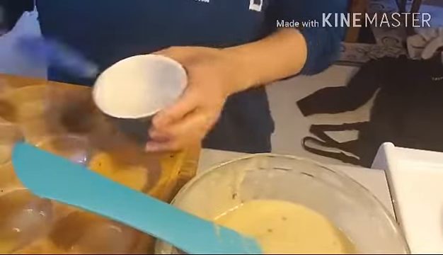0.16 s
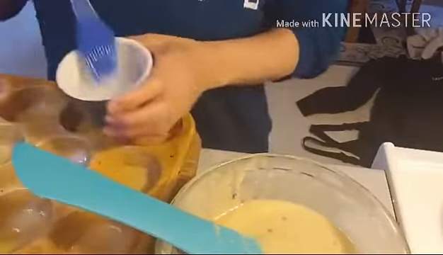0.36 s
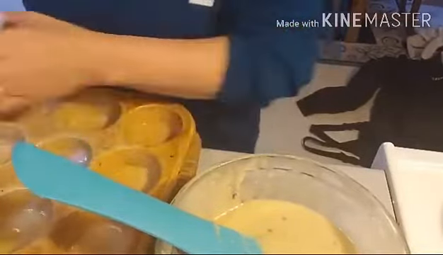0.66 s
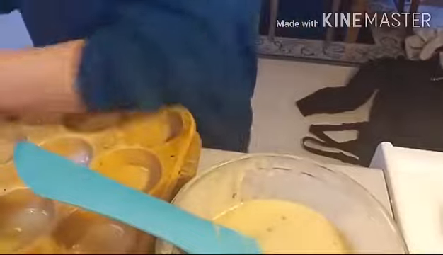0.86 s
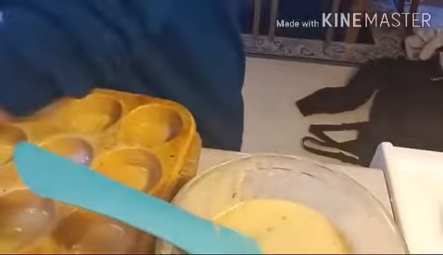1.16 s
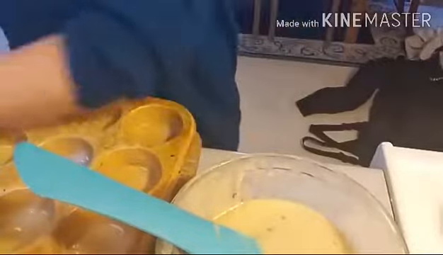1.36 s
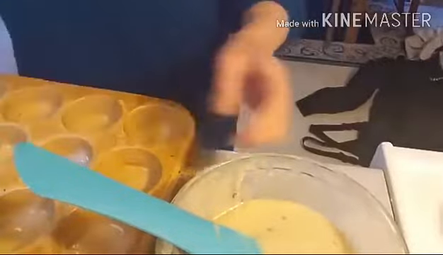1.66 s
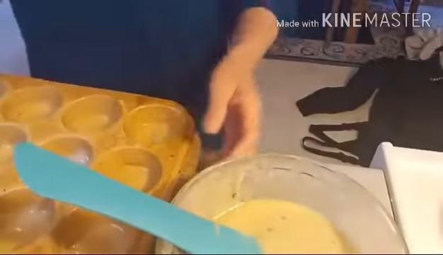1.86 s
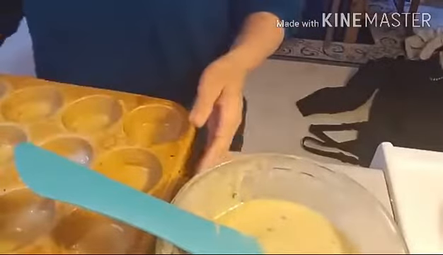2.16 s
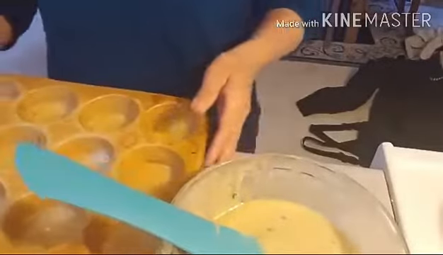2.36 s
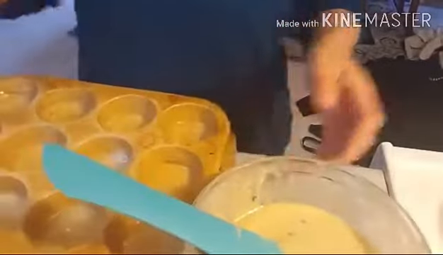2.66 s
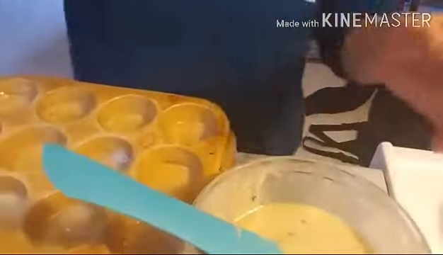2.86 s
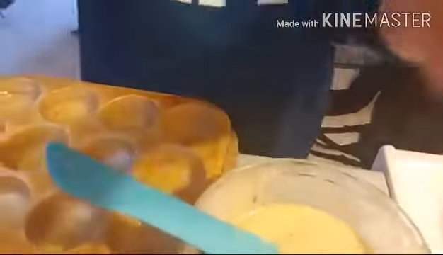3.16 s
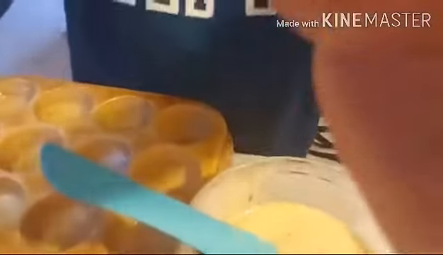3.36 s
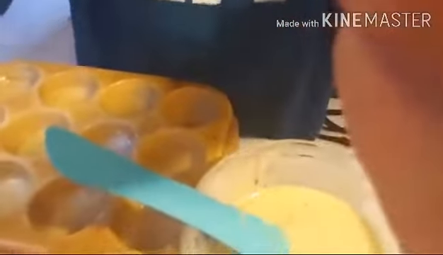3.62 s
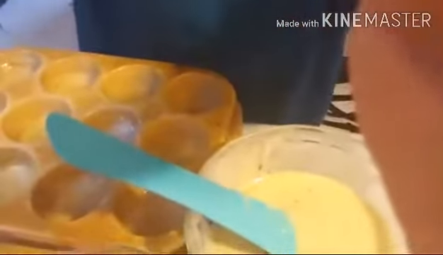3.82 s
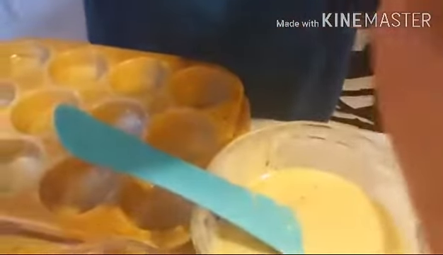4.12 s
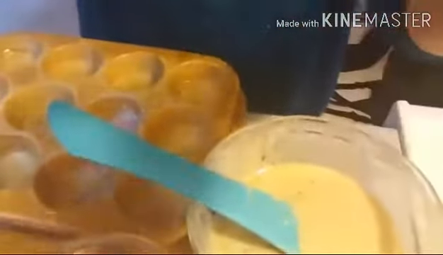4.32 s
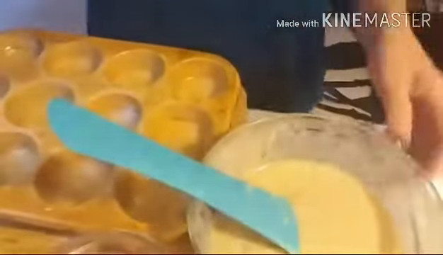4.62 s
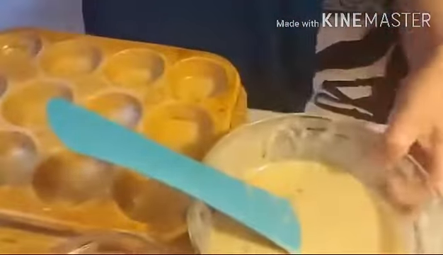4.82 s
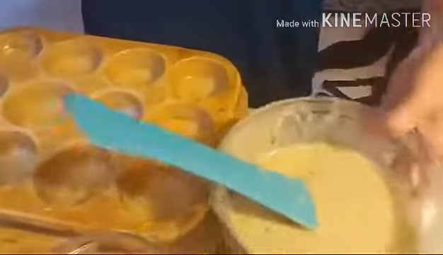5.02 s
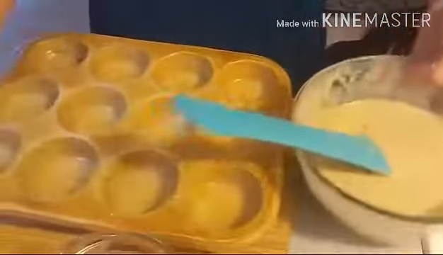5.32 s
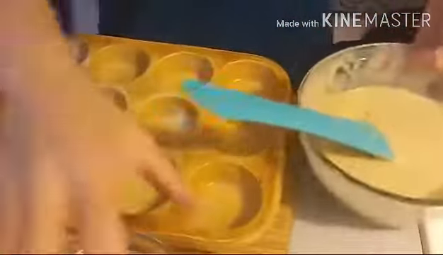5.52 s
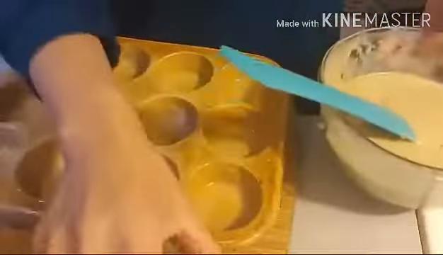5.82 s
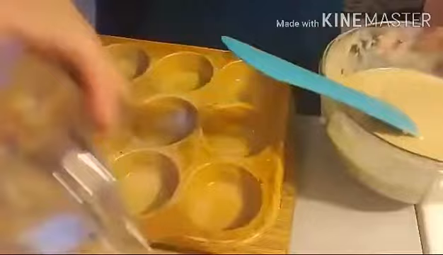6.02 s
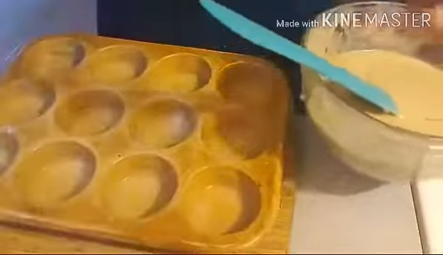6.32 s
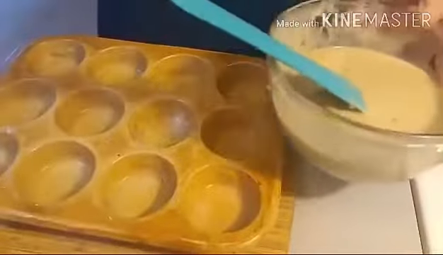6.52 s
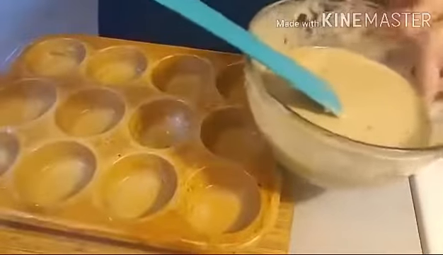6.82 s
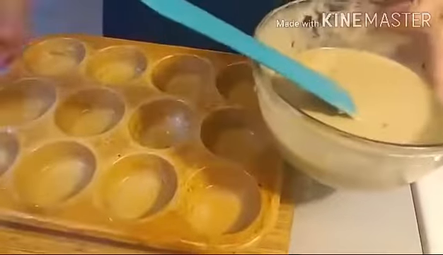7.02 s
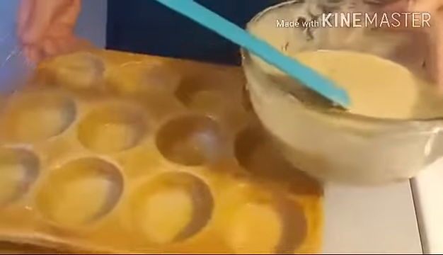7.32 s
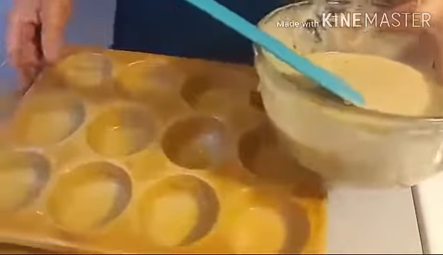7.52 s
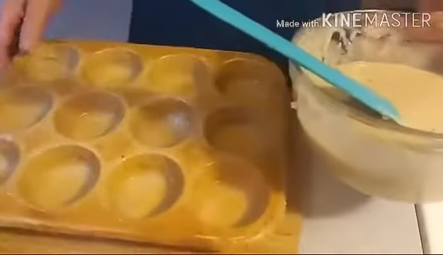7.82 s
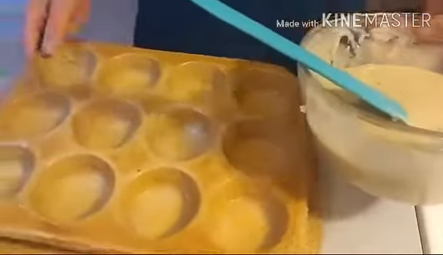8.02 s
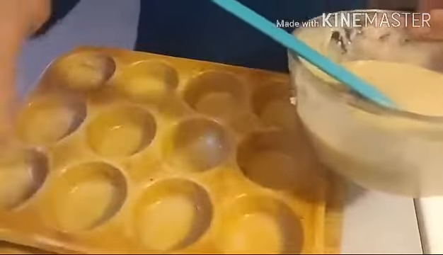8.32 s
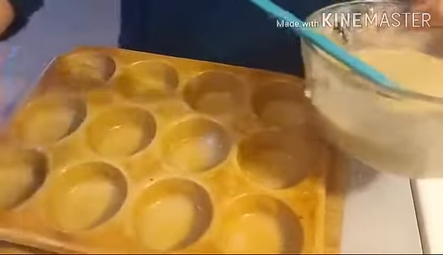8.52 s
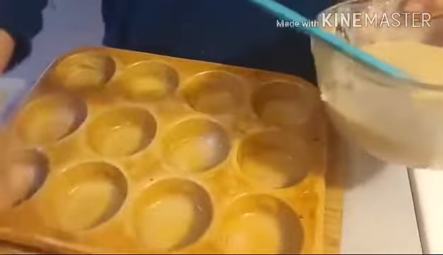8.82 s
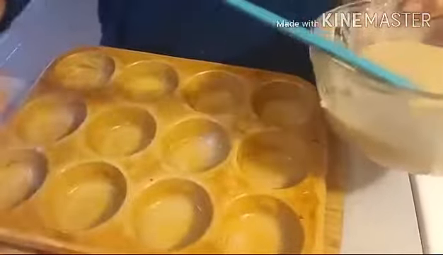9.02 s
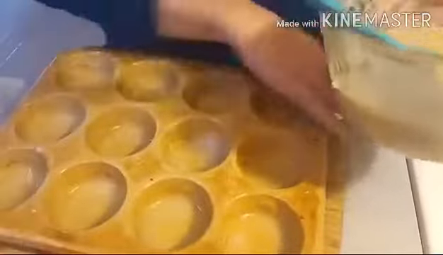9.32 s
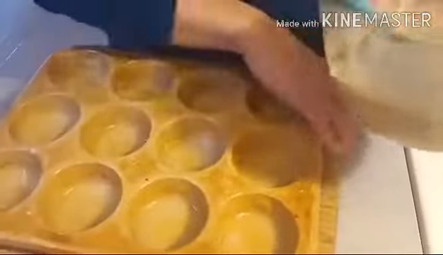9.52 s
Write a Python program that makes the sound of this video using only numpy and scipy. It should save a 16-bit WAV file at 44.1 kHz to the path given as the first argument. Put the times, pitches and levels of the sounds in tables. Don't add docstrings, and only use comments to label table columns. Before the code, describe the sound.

A small, fairly dry kitchen heard close from a handheld microphone, with a very faint low appliance drone that drops after about 1.9 seconds, and soft grip rumble. At 0.06 a lid double-taps lightly. Low bump at 1.1; thin high squeaks from 1.3 to 1.65 accompany a cup set down in dull knocks at 1.55 and, louder, 1.65. A glass bowl lands and rocks at 2.8 to 2.9. From 3.2 to 5 only muffled bumps, faint rubbing and tiny squeaks. A rustle at 5.4 leads to heavy, damped wooden board knocks at 5.56, 5.7 and 5.76, then 6.9 to 7.05. A muffin tin clatters brightly from 7.68 to 7.9, with another knock at 8.19 amid sliding. At 9.06 a glass lands ringing, scrapes strongly around 9.15, settles at 9.27, and a sharp dry snap follows at 9.37, fading into soft rustle.

```python
import sys
import numpy as np
from scipy import signal
from scipy.fft import rfft, irfft, next_fast_len
from scipy.io import wavfile
from scipy.ndimage import uniform_filter1d, map_coordinates

SR = 44100
rng = np.random.default_rng(int(sys.argv[2]) if len(sys.argv) > 2 else 0)


def unload_wav(signal):
    wavfile.write(
        sys.argv[1],
        SR,
        np.round(np.clip(np.atleast_2d(signal).T, -1, 1) * 32767).astype(np.int16),
    )


def field_ratio(decibels):
    return 10 ** (np.asarray(decibels, dtype=float) / 20)


N = 426447


def unit(x):
    return x / np.sqrt(np.mean(x ** 2) + 1e-20)


def along(points, hz):
    f, v = np.transpose(points)
    return np.interp(np.log(hz + 1), np.log(f + 1), v)


def curve(points):
    s, value = np.transpose(points)
    return np.interp(np.arange(N) / SR, s, value)


def wobble(rate):
    knots = rng.standard_normal(int(N * rate / SR) + 4)
    return map_coordinates(knots, [np.arange(N) * rate / SR])


# frequency in Hz, likeness from 0 to 1.
ALIKE = [(60, .99), (180, .94), (520, .75), (1540, .15), (4560, 0), (13500, 0)]


def diffuse(pair, gain):
    m = next_fast_len(pair.shape[1] + 4096)
    hz = np.fft.rfftfreq(m, 1 / SR)
    turn = np.arccos(np.clip(along(ALIKE, hz), -1, 1)) / 2
    spectrum = rfft(pair, m) * gain(hz) * [np.cos(turn), np.sin(turn)]
    mid, side = irfft(spectrum, m)[:, :pair.shape[1]]
    return unit(np.array([mid + side, mid - side]))


def rush(spectrum, grain_db, rate):
    grains = field_ratio(grain_db * wobble(rate)) * rng.standard_normal((2, N))
    return diffuse(grains, lambda hz: field_ratio(along(spectrum, hz)))


def patchy(x, depth_db):
    z = signal.stft(x, nperseg=512)[2]
    field = uniform_filter1d(rng.standard_normal(z.shape[1:]), size=4, axis=0)
    field = uniform_filter1d(field, size=9, axis=1)
    return unit(signal.istft(z * field_ratio(depth_db * unit(field)), nperseg=512)[1][:, :N])


def causal(gain_db):
    cepstrum = irfft(np.log(field_ratio(gain_db)))
    half = cepstrum.shape[-1] // 2
    cepstrum[..., 1:half] *= 2
    cepstrum[..., half + 1:] = 0
    return np.exp(rfft(cepstrum))


# frequency in Hz, t60 in s.
KITCHEN = [(150, 0.27), (600, 0.21), (3000, .28), (12000, 0.094)]


def kitchen(x, room_db):
    hz, t, z = signal.stft(rng.standard_normal((2, SR // 2)), SR, nperseg=256)
    decay = field_ratio(-60 * t / along(KITCHEN, hz)[:, None])
    tail = signal.istft(z * decay, SR, nperseg=256)[1]
    tail = diffuse(tail, np.ones_like)
    late = np.pad(x, (round(.005 * SR), 0))[None]
    return field_ratio(room_db) * signal.fftconvolve(late, tail / np.linalg.norm(tail[0]), axes=1)


# lower edge in Hz, upper edge in Hz.
BANDS_HZ = [(50, 300), (300, 850), (900, 2400), (2500, 3500), (3600, 6000), (6000, 12600)]
RING_S = [.035, .035, .04, .04, .14]
CUP_RING_S, BOWL_RING_S, BOARD_RING_S, TIN_RING_S, GLASS_RING_S = RING_S
THUD_GROWS, SIZZLE_GROWS = 1.494, 1
RAGGED_MAX_DB = 4.5
UNLIKE = 0.57


def knocks(hits, modes, ring_s, thud_db, crisp_db, sizzle_db, chatter_s, rise_s, clack_db, patchy_db,
           pan_db, lag_ms, room_db, beamed_db):
    out, size = np.zeros((2, N + 2 * SR)), 16384
    t, f = np.arange(size) / SR, np.fft.rfftfreq(size, 1 / SR)
    hz, level, t60 = np.array(modes)[:, :, None, None].transpose(1, 0, 2, 3)
    ear = np.array([[-.5], [.5]])
    apart = lambda f: ear * f / (f + 500)
    width = np.log(1000) / (np.pi * np.minimum(t60, ring_s))
    for s, db, weight_db, hard_db, linger_db in hits:
        scatter = rng.standard_normal((3, len(modes), 1, 1))
        centre = hz * (1 + .006 * scatter[0])
        gain = field_ratio(level + 3 * scatter[1] + 5 * apart(hz) * scatter[2])
        ring = (gain * 1j * f * centre / (centre ** 2 - f ** 2 + 1j * f * width)).sum(0)

        rough = uniform_filter1d(rng.standard_normal((2, len(f))), size=80)
        shared, own = uniform_filter1d(rough, size=80)
        ragged_db = f / (f + 900) * unit(shared) + 1.8 * apart(f) * unit(own)
        ragged_db = min(patchy_db, RAGGED_MAX_DB) * ragged_db
        clack = causal(ragged_db - 5 * np.log2(1 + f / 300))

        push = (1 - np.exp(-t / rise_s)) ** 2 * field_ratio(-60 * t / chatter_s / field_ratio(linger_db))
        force, stray = rfft(rng.standard_normal((2, size)) * push)
        travel = force + 2 * UNLIKE * apart(f) * stray
        travel = travel * np.exp(2j * np.pi * f * ear * lag_ms / 1000)
        pair = np.roll(irfft(travel * np.array([ring, clack])), shift=16, axis=2)
        pair[1] *= field_ratio(-60 * t / .09)

        balance_db = (thud_db + THUD_GROWS * weight_db, weight_db, 0,
                      crisp_db + hard_db, hard_db, sizzle_db + SIZZLE_GROWS * hard_db)
        blow = spread = 0
        for edges, band_db in zip(BANDS_HZ, balance_db):
            band = signal.butter(4, edges, "bandpass", fs=SR, output="sos")
            part = signal.sosfilt(band, pair)
            rung = unit(part[0])
            ragged = field_ratio(clack_db[edges[0] > 2400]) * unit(part[1])
            side = field_ratio(-ear * pan_db * (edges[0] > 200))
            scale = field_ratio(db + band_db) / np.abs((rung + ragged).mean(0)).max()
            blow = blow + side * scale * (rung + ragged)
            spread = spread + scale * (field_ratio(beamed_db) * rung + ragged)[0]
        tail = kitchen(spread, room_db)
        at = round((s - rise_s) * SR)
        out[:, at:at + size] += blow
        out[:, at:at + tail.shape[1]] += tail
    return out[:, :N]


# time in s, level in dB.
DRONE = [(0, -60), (1.6, -56.5), (1.95, -65.5), (5, -62.5), (7.5, -62.5), (8.2, -62.5), (9.67, -63.5)]
# frequency in Hz, density in dB per Hz.
AIR = [(60, -34.5), (110, 0), (400, -9.5), (800, -28), (1050, -32.5), (2500, -39.5), (7500, -45.5),
       (13500, -49.5)]
# centre in Hz, width in Hz, gain in dB.
CASING = [(162, 18, 8), (247, 22, 11.5), (359, 16, 12), (550, 60, 3), (740, 120, 3)]


def drone():
    casing = lambda f: 1 + sum(field_ratio(db) / (1 + (2 * (f - c) / w) ** 2) for c, w, db in CASING)
    noise = diffuse(rng.standard_normal((2, N)), lambda hz: field_ratio(along(AIR, hz)) * casing(hz))
    return field_ratio(curve(DRONE) + 0.4 * wobble(13)) * noise


# time in s, level in dB.
GRIP = [(0.0, -56), (0.97, -60.5), (1.48, -58), (1.88, -67.5), (2.91, -62.5), (3.53, -68.5), (5.38, -58.5),
        (5.66, -82.5), (5.93, -61), (6.68, -71), (7.0, -58), (7.38, -71), (7.78, -43), (7.94, -55.5),
        (8.7, -65), (9.18, -59), (9.67, -67.5)]
# frequency in Hz, density in dB per Hz.
RUMBLE = [(12, -43.5), (20, -10), (81, -2.5), (130, -16), (186, -4.5), (268, -12.5), (390, -45),
          (660, -120)]


def hands():
    return field_ratio(curve(GRIP)) * rush(RUMBLE, grain_db=3.5, rate=26)


# start in s, hold in s, level in dB, pressure in dB, dryness in dB.
STROKES = [(.01, 0.031, -69.5, 5.5, -9), (0.973, 0.02, -69.5, 9.5, -0.5), (1.195, 0.048, -68, -6.5, 0),
           (1.336, 0.02, -64, 3, -12), (1.435, 0.13, -91.5, 11.5, 13), (2.528, 0.027, -72.5, -4.5, -16.5),
           (2.752, 0.066, -57.5, -4, -5.5), (3.194, 0.016, -72.5, 12.5, -13.5),
           (3.959, 0.055, -77.5, -30.5, -2), (4.139, 0.048, -80, -11.5, -2.5),
           (4.251, 0.05, -63.5, -7.5, -6.5), (4.352, 0.017, -67.5, -11.5, -10),
           (4.709, 0.043, -85.5, 7, -24), (5.329, 0.03, -67, 9, -25.5), (5.389, 0.045, -60.5, 7, -20),
           (5.483, 0.14, -53, 4, -7), (6.09, 0.026, -96.5, 30, 6), (6.597, 0.22, -90.5, -30, 7),
           (7.224, 0.057, -86.5, 20.5, -3), (7.625, 0.18, -58.5, -7, -4), (8.125, 0.048, -52, -4, -3.5),
           (8.424, 0.18, -62.5, 0.5, -5), (8.865, 0.018, -55.5, 2.5, -13), (9.145, 0.076, -39, 0, -4.5),
           (9.334, 0.075, -65, -2, 17), (9.435, 0.1, -63, -13, -12)]
REST_DB = [-84.5, -89, -89.5]
RISE_S, FADE_S, RISE_SHARE, FADE_SHARE = 0.032, 0.065, 0.5, 0.82


def strokes():
    t = np.arange(N) / SR
    gain = field_ratio(np.array(REST_DB))[:, None] * np.ones(N)
    for s, hold, db, pressure_db, dryness_db in STROKES:
        near = slice(max(round((s - .6) * SR), 0), round((s + hold + .9) * SR))
        before = np.maximum(s - t[near], 0) / (RISE_S + RISE_SHARE * hold)
        after = np.maximum(t[near] - s - hold, 0) / (FADE_S + FADE_SHARE * hold)
        register_db = np.array([[pressure_db], [0], [dryness_db]])
        gain[:, near] += field_ratio(db + register_db) * field_ratio(-30 * (before + after))
    return gain


# frequency in Hz, density in dB per Hz.
DRAG = [(150, -48), (300, -3), (550, 2), (900, -6), (1400, -41.5)]
# frequency in Hz, density in dB per Hz.
SLIDE = [(290, -42), (500, -17), (736, -10), (1250, -9.5), (2400, -11), (3800, -19.5), (5850, -60),
         (9900, -120)]
# frequency in Hz, density in dB per Hz.
FIZZ = [(1760, -22), (3000, -7), (5630, -6), (7570, -3.5), (10800, -15), (12300, -12), (13500, -30)]


def sliding():
    m = next_fast_len(N)
    hz = np.fft.rfftfreq(m, 1 / SR)
    rim = sum(field_ratio(db / 3) / (1 + ((hz - c) / 45) ** 2) for c, db, _ in GLASS)
    t, grip_db = np.arange(N) / SR, 2 * wobble(23)
    layers = [patchy(rush(DRAG, grain_db=-1.0, rate=52), depth_db=4.5),
              patchy(rush(SLIDE, grain_db=0.5, rate=260), depth_db=3.5),
              patchy(rush(FIZZ, grain_db=2, rate=240), depth_db=5.5)]
    out = sum(field_ratio(grip_db) * gain * layer for gain, layer in zip(strokes(), layers))
    sung = irfft(rfft(out, m) * (.35 + 2.2 * rim), m)[:, :N]
    dragged = (t > GLASS_HITS[0][0]) & (t < SNAP_HITS[0][0])
    return np.where(dragged, sung, out)


# time in s, peak in dB (900-2400 Hz), weight in dB, hardness in dB, lingering in dB.
LID_HITS = [
    (0.0637, -30, 0.46, -20, 0),
    (0.068, -26, 0.31, -27, 0),
]
# frequency in Hz, level in dB, t60 in s.
LID = [(673, -10, .025), (754, -2, 0.035), (1036, -3, 0.018), (1220, -4.5, 0.032), (1430, 1, 0.034),
       (1600, -9, 0.0238), (1750, -7, 0.0304), (3250, -15, 0.017), (4280, -21, 0.017)]


def lid():
    return knocks(LID_HITS, LID, CUP_RING_S, thud_db=-19, crisp_db=3.5, sizzle_db=-14.5,
                  chatter_s=0.018, rise_s=.001, clack_db=(-3, 0), patchy_db=5,
                  pan_db=0.2, lag_ms=0.07, room_db=-13, beamed_db=-2.5)


# time in s, peak in dB (900-2400 Hz), weight
# in dB, hardness in dB, lingering in dB.
CUP_HITS = [(0.3294, -92.5, 40, -17, -1.5), (0.6424, -88, 30.5, -10, 5), (1.3222, -56, 3, -10, 1.5),
            (1.5457, -25, 11.5, -12, -4), (1.5545, -29.5, 15, -17, -3), (1.5674, -30.5, 2, -25.5, -1),
            (1.6478, -16, 0.5, -22, -5.5), (1.6538, -19, 4, -17, 0), (1.666, -23.5, 2.5, -17.5, -1),
            (1.6784, -26.5, -3, -19, 0), (1.69, -32, 0, -15, 1), (1.718, -38, 2, -5.5, -0.5),
            (1.628, -42, 10, -24.5, 2),
            (2.0116, -80, 24, -25, 0),
]
# frequency in Hz, level in dB, t60 in s.
CUP = [(332, -7.5, .06), (517, 9.5, 0.014), (677.7, -4.5, .06), (773, -8.5, .06), (1280, 0, 0.0088),
       (1750, -14, 0.087), (4380, -36, .1), (7160, -11, 0.2), (4300, -32, .06), (11080, -21, .1)]


def cup():
    return knocks(CUP_HITS, CUP, CUP_RING_S, thud_db=-13.0, crisp_db=2, sizzle_db=-7,
                  chatter_s=0.04, rise_s=0.001, clack_db=(-3, -5.5), patchy_db=4.0,
                  pan_db=0.2, lag_ms=0.24, room_db=-10.0, beamed_db=-5)


# time in s, peak in dB, frequency in Hz, t60 in s.
THUMPS = [(1.115, -36.5, 66.6, 0.14), (2.516, -50.5, 110, 0.18), (3.199, -30.5, 140, 0.061),
          (3.399, -49, 111, 0.1), (3.766, -37.5, 117.7, 0.11), (4.277, -46, 140, 0.21),
          (4.368, -41, 63.8, 0.2), (4.963, -42.5, 83, 0.16), (7.556, -33.5, 81, 0.062),
          (6.928, -30, 63.4, 0.14), (3.17, -36, 122, 0.083), (8.348, -50.5, 74.5, 0.098)]


def thumps():
    out, t = np.zeros(N + SR), np.arange(SR // 2) / SR
    for s, db, hz, t60 in THUMPS:
        swing = np.sin(2 * np.pi * hz * t)
        swing += 0.35 * np.sin(2 * np.pi * 0.646 * hz * t + rng.uniform(0, 2 * np.pi))
        out[round(s * SR):][:len(t)] += field_ratio(db - 60 * t / t60) * (1 - np.exp(-t / 0.0022)) * swing
    return out[:N]


# start in s, length in s, first pitch in Hz, last pitch in Hz, level in dB.
CUP_SQUEAKS = [
    (1.335, .12, 3900, 4000, -69),
    (1.363, .09, 3700, 3720, -73),
    (1.393, .05, 3420, 3450, -62),
    (1.46, .047, 3420, 3450, -59),
    (1.513, .04, 3500, 3540, -68),
]
# start in s, length in s, first pitch in Hz,
# last pitch in Hz, level in dB.
PURE_SQUEAKS = [
    (2.493, 0.016, 1520, 1419, -60.5),
    (3.382, 0.08, 5040, 5173, -60.5),
    (3.493, 0.047, 5040, 4700, -72.5),
    (3.666, 0.085, 2755, 2470, -75.5),
    (3.965, 0.1, 4070, 4220, -64.5),
    (1.527, 0.03, 3900, 4007, -65),
    (1.565, 0.091, 4000, 4050, -62.5),
    (6.56, 0.084, 1846, 1715, -79.5),
]
CUP_OCTAVE_DB, PURE_OCTAVE_DB = 0.5, -25
WAVER = .006


def squeaks():
    out, waver = np.zeros(N), 1 + WAVER * wobble(90)
    rows = [(*row, CUP_OCTAVE_DB) for row in CUP_SQUEAKS]
    rows += [(*row, PURE_OCTAVE_DB) for row in PURE_SQUEAKS]
    for s, length, first_hz, last_hz, db, octave_db in rows:
        at, u = round(s * SR), np.linspace(0, 1, round(length * SR))
        pitch_hz = (first_hz + (last_hz - first_hz) * u) * waver[at:][:len(u)]
        phase = 2 * np.pi * np.cumsum(pitch_hz) / SR
        tone = np.sin(phase) + field_ratio(octave_db) * np.sin(2 * phase)
        out[at:][:len(u)] += field_ratio(db) * np.sin(np.pi * u) ** .6 * tone
    out = out * field_ratio(3 * wobble(60))
    return out * field_ratio([[1], [-1]]) + kitchen(out, room_db=-11)[:, :N]


# time in s, peak in dB (900-2400 Hz), weight in dB, hardness
# in dB, lingering in dB.
BOWL_HITS = [(2.6764, -51, 11, 3.5, 0.0044), (2.6804, -44.5, 11.5, 4, 0.0026), (2.821, -14.5, 4.5, -6.5, 0),
             (2.8295, -16.5, -0.5, -10.5, 0), (2.8434, -16.5, -2, -31, 0), (2.862, -30.5, -7, -10, 0),
             (2.8814, -24, -4, -21, 0), (2.9243, -31.5, -2, -12, 0), (3.8004, -80, -3.5, 9.5, 0.0063),
             (3.8784, -71, 2, -12.5, 0), (3.899, -63, -5, -13.5, 0.0094), (4.5184, -81.5, 7.5, 7.5, 0.0023),
             (2.8136, -30, 0.0031, -12, 0.0014),
]
# frequency in Hz, level in dB, t60 in s.
BOWL = [(198, 4, 0.078), (526, -2.5, 0.036), (725, -8.5, 0.046), (1397, -3.5, 0.047), (1770, 1, 0.11),
        (2470, -31, 0.083), (4340, -11.5, 0.038), (7250, -20, 0.11)]


def bowl():
    return knocks(BOWL_HITS, BOWL, BOWL_RING_S, thud_db=-11, crisp_db=-0.5, sizzle_db=-11,
                  chatter_s=0.031, rise_s=.0025, clack_db=(.6, .6), patchy_db=5.0,
                  pan_db=-0.57, lag_ms=0.044, room_db=-13.5, beamed_db=-2.5)


# time in s, peak in dB (900-2400 Hz), weight in dB,
# hardness in dB, lingering in dB.
BOARD_HITS = [(5.3134, -71.5, 27.3, -20.5, 0.5), (5.449, -55.5, 13, -3, -3), (5.4858, -41.5, 18.5, -29, -1),
              (5.4955, -38.5, 20.4, -14.5, -5), (5.515, -50, 8.3, -11, 0), (5.534, -41, 12.5, -9.5, 6.5),
              (5.5604, -21, 12, -19, 1), (5.58, -44, 10, -25.5, 2), (5.597, -60, 8.3, -21, -3),
              (5.6885, -21.5, 3.9, -7, 8), (5.7486, -35.5, 16.3, -10, 0), (5.765, -28, 4.7, -12, 5.5),
              (6.0367, -76, 26, -23.5, -0.5), (6.1864, -77, 38.6, -24, -3), (6.5965, -63.5, 16.2, -16.5, 3),
              (6.8755, -32.5, 5.4, -5.5, 4.5), (6.9276, -24, 15.8, -10.5, -2), (6.9495, -41, 9, -22, -3),
              (7.0405, -31.5, 12.2, -22, 3.5), (7.2453, -59, 17.5, -36.5, 1.5),
              (6.908, -40, 4.1, -4.1, 2.1),
]
# frequency in Hz, level in dB, t60 in s.
BOARD = [(195, 16.5, 0.05), (356, -30.5, 0.033), (464, 14, 0.013), (526, 6.5, 0.0045), (667, -7.5, 0.071),
         (1253, -23.5, 0.11), (1750, -25, 0.03), (3380, -31, 0.018), (4613, -27.5, .03),
         (7300, -31.5, 0.035)]


def board():
    return knocks(BOARD_HITS, BOARD, BOARD_RING_S, thud_db=-14, crisp_db=-3, sizzle_db=-3.0,
                  chatter_s=0.023, rise_s=0.0013, clack_db=(1.5, -3), patchy_db=4.0,
                  pan_db=1.0, lag_ms=0.045, room_db=-7.5, beamed_db=-3.5)


# time in s, peak in dB (900-2400 Hz), weight in dB, hardness in dB, lingering in dB.
TIN_HITS = [(7.6004, -46.5, -10, 2, 2), (7.6852, -16, -6, -16.5, -3.5), (7.693, -18, -6, -15, -3.5),
            (7.7225, -18, -8.5, -10.5, 5.5), (7.7381, -21, -6.5, -14, 7), (7.7615, -11.5, -5, -12, -3.5),
            (7.7739, -11, -9, -14.5, -3.5), (7.79, -19, -11, -14, -0.5), (7.8739, -11.5, -4, -13, -2.5),
            (7.8951, -27.5, 1, -18.5, 1), (7.9125, -31, -8.5, -14.5, 3), (8.1014, -48.5, 9, -27, 6),
            (8.189, -21, -2.5, -13, 0), (8.3797, -63.5, 1, -5, 2.5), (8.4055, -47, -27.5, -8.5, 5.5),
            (8.5505, -53, -11.5, -1, 1.5), (8.8505, -46, -9, -16, -2.5)]
# frequency in Hz, level in dB, t60 in s.
TIN = [(717, 6, 0.03), (1150, -11.5, 0.043), (1270, -6.5, 0.044), (1340, -12.5, 0.018), (1650, -13, 0.069),
       (1733, -3.5, 0.11), (2053, -17, 0.023), (3070, 3.5, .03), (3590, -2.5, 0.025), (3943, -3.5, 0.02),
       (4220, -9, 0.04), (4650, -22, 0.017), (5400, -22, 0.013), (7440, -17.5, 0.03)]


def tin():
    return knocks(TIN_HITS, TIN, TIN_RING_S, thud_db=-10.5, crisp_db=-1.5, sizzle_db=-3.5,
                  chatter_s=0.034, rise_s=0.0023, clack_db=(-5, -5), patchy_db=5.0,
                  pan_db=1.27, lag_ms=0.014, room_db=-12, beamed_db=-5.5)


# time in s, peak in dB (900-2400 Hz), weight in dB, hardness in dB, lingering in dB.
GLASS_HITS = [
    (9.0578, -12, -6, -14, -5.5),
    (9.0714, -21, -6.5, -9, 4.5),
    (9.1552, -25, -0.5, -16.5, 2),
    (9.184, -29, 0, -14.5, 1.5),
    (9.2733, -31, 1, -12.5, 1.5),
]
# as GLASS_HITS, time in s, then four in dB.
GLASS_TOUCH = [
    (9.018, -60, -11.5, -30.5, 6.2),
    (9.033, -55, -15, -30, 6),
    (9.042, -47, -14, -30, 6),
]
# frequency in Hz, level in dB, t60 in s.
GLASS = [(665, -4, 0.04), (1438, -3, 0.05), (2080, -6, 0.09), (2470, -10, .07), (2988, -8, .07),
         (4165, -12, 0.09), (5460, -15, .1), (6936, -18, 0.09), (7440, -18, .09), (7735, -17, 0.1),
         (8549, -19, 0.09), (9200, -17, 0.07), (11390, -18, 0.1), (11870, -18, .1)]


def glass():
    return knocks(GLASS_HITS + GLASS_TOUCH, GLASS, GLASS_RING_S, thud_db=-11, crisp_db=3.5, sizzle_db=3.3,
                  chatter_s=0.034, rise_s=.0015, clack_db=(1.5, -13), patchy_db=3.5,
                  pan_db=-0.05, lag_ms=0.16, room_db=-8.5, beamed_db=-1)


# time in s, peak in dB (900-2400 Hz), weight in dB, hardness in dB, lingering in dB.
SNAP_HITS = [
    (9.348, -41.5, -3.5, -8, 5.5),
    (9.3652, -23.5, -16, 6.5, 2),
]


def snap():
    return knocks(SNAP_HITS, BOWL, BOWL_RING_S, thud_db=3.0, crisp_db=-10.5, sizzle_db=3,
                  chatter_s=0.016, rise_s=.002, clack_db=(8.5, 8.5), patchy_db=3.0,
                  pan_db=-1.0, lag_ms=0.23, room_db=-19.5, beamed_db=-2.5)


def scene():
    steady = drone() + hands() + sliding()
    objects = lid() + cup() + bowl() + board() + tin() + glass() + snap()
    return steady + objects + thumps() + squeaks()


def top_cut(x):
    return signal.sosfilt(signal.butter(12, 14060, fs=SR, output="sos"), x)


def record(dry):
    rounded = dry / (1 + np.abs(dry / .6) ** 4) ** .25
    m, top_hz = next_fast_len(N), 13300
    kept = irfft(rfft(rounded, m) * (np.fft.rfftfreq(m, 1 / SR) < top_hz), m)[:, :N]
    return top_cut(kept)


dry = scene()
out = record(dry)
unload_wav(out)
```